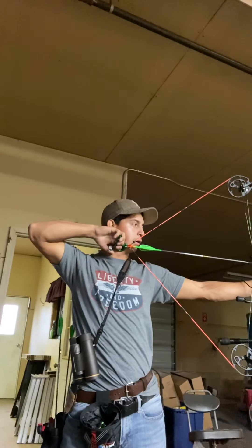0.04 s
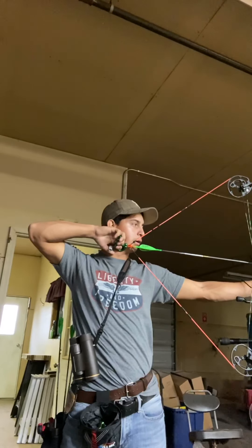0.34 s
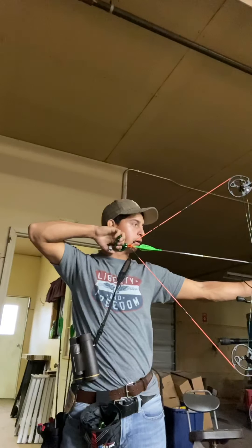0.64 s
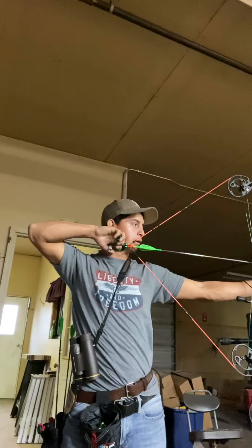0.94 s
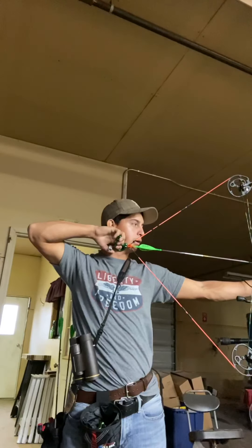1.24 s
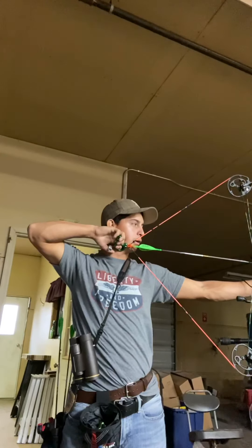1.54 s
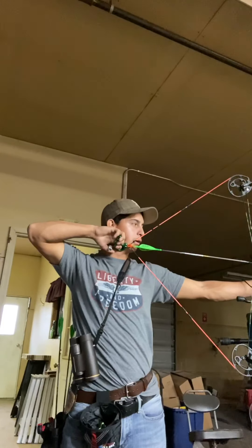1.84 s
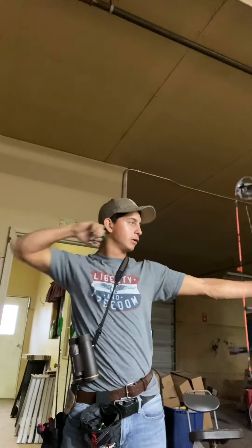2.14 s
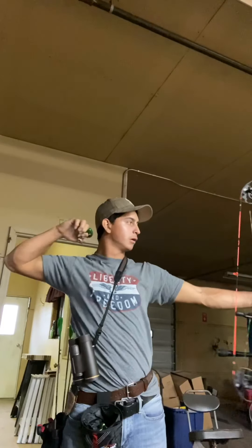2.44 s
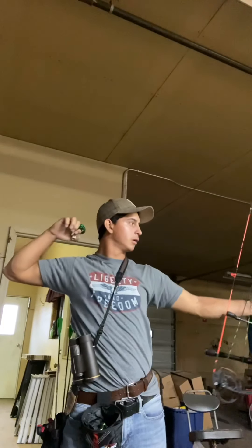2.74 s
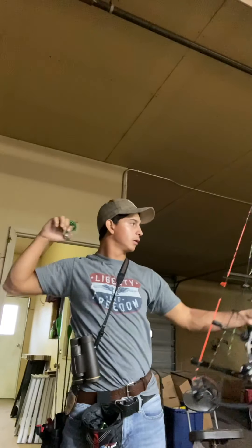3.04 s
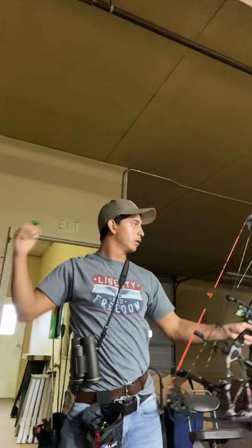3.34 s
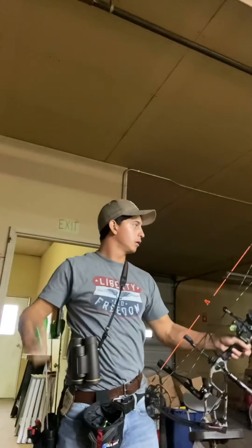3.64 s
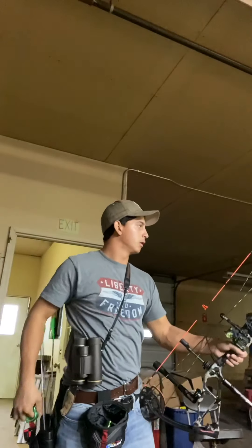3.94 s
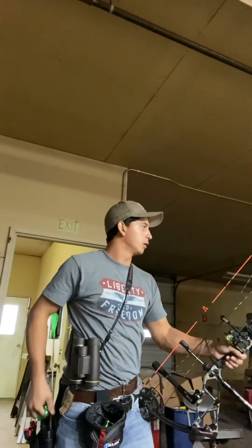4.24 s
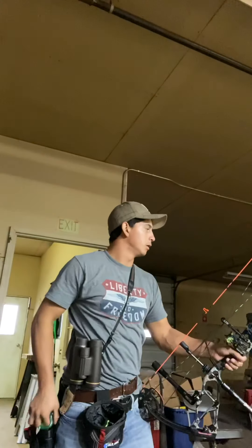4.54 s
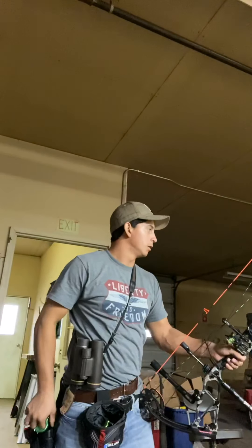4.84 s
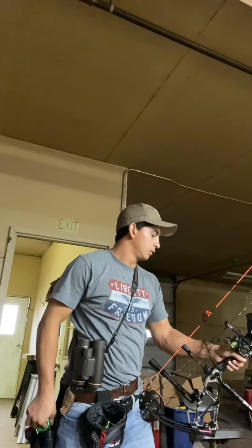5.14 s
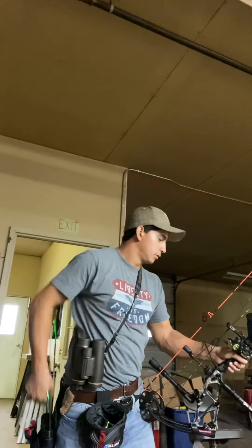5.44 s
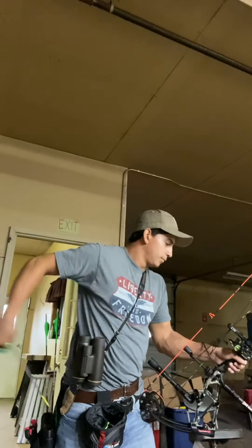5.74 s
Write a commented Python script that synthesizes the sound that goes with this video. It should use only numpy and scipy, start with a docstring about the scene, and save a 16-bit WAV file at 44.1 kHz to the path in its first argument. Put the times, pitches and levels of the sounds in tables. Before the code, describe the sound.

Ventilation rumbles and mains power hums softly in a large workshop. About two seconds in, a compound bow is shot close to the microphone: a click, a sharp string slap and a brief ringing thump. A moment later the arrow thuds into a far target and echoes through the hall. Then the archer's gear ticks, knocks and clinks, with some cloth rustling, while a low drone swells.

```python
"""First comes the rumble of ventilation and the hum of mains power in a large workshop.
About 2 s in, a compound bow is shot close by: the release (the clasp holding the string) clicks open,
the string slaps home, and the limbs (the bow's springy arms) thump and ring. 0.3 s later the arrow
thuds into a far target and fills the hall with echoes. Then the archer's gear ticks, knocks and
rustles while a low drone swells."""
import sys
import numpy as np
from scipy import signal
from scipy.fft import rfft, irfft
from scipy.io import wavfile

SR = 44100
rng = np.random.default_rng(int(sys.argv[2]) if len(sys.argv) > 2 else 0)


def output_pcm(signal):
    """Save a mono or channel-first signal as 16-bit PCM at the path in sys.argv[1].

    Samples are clipped to [-1, 1] before scaling.
    """
    pcm = np.clip(np.atleast_2d(signal).T, -1, 1) * 32767
    wavfile.write(sys.argv[1], SR, np.round(pcm).astype(np.int16))


N = 260190


def undb(db):
    """Turn decibels (dB) into a gain. Levels in this file are relative: later steps scale them."""
    return 10 ** (np.asarray(db) / 20)


def at_hz(points, hz):
    """Read a curve between its points, giving every octave equal room."""
    f, value = np.transpose(points)
    return np.interp(np.log(np.maximum(hz, 1)), np.log(f), value)


def colour(x, points, size=4096):
    """Make some frequencies louder and others softer."""
    cepstrum = irfft(np.log(undb(at_hz(points, np.fft.rfftfreq(size, 1 / SR)))))
    # fold the filter forward in time, so nothing sounds before the hit
    cepstrum[1:size // 2] *= 2
    cepstrum[size // 2 + 1:] = 0
    return signal.fftconvolve(x, irfft(np.exp(rfft(cepstrum))))[:N]


def wash(points):
    """Noise from all around, as mid (what left and right share) and side (how they differ)."""
    gain = undb(at_hz(points, np.fft.rfftfreq(N, 1 / SR)))
    noise = irfft(rfft(rng.standard_normal((2, N))) * gain, N)
    return noise / noise.std()


def wander(turns_per_s):
    """A random drift around zero, about 1 in size."""
    knots = rng.standard_normal(400)
    return np.interp(np.arange(N) / SR * turns_per_s, np.arange(len(knots)), knots)


def unit(x):
    """Scale to an energy of 1."""
    return x / np.sqrt(np.sum(x ** 2, axis=-1, keepdims=True))


def contacts(rows, points, size=4096, even_passes=3):
    """Each hit is a short chatter of force, coloured by the thing it strikes."""
    force, t = np.zeros(N + size), np.arange(size) / SR
    for (s, db, t60, *_), grit in zip(rows, rng.standard_normal((len(rows), size))):
        fade = undb(-60 * t / max(t60, .002))  # t60 is the fade time: seconds to drop 60 dB
        for _ in range(even_passes):  # a hard hit drives all frequencies alike
            spectrum = rfft(grit * fade)
            even = irfft(spectrum / np.abs(spectrum))
            grit = np.clip(even / (fade * unit(fade)[0] + 1e-12), -3, 3)
        start = min(int(s * SR), N)
        force[start:start + size] += undb(db) * unit(grit * fade)
    return colour(force[:N], points)


def resonate(force, modes):
    """A force shakes a small part at its modes, the pitches it naturally rings at."""
    hz = np.maximum(np.fft.rfftfreq(N, 1 / SR), 1)
    response = sum(undb(db) / (1 + 1j * (hz ** 2 - f ** 2) / (hz * width)) for f, width, db in modes)
    return irfft(rfft(force) * response, N)


def ring(start_s, modes, rise_s, size=32768):
    """A struck part rings with pure tones that die away."""
    t, start = np.arange(size) / SR, int(start_s * SR)
    tones = sum(undb(db - 60 * t / t60) * np.sin(2 * np.pi * hz * t) for hz, db, t60 in modes)
    return np.pad(tones * (1 - np.exp(-t / rise_s)), (start, N))[:N]


def jolts(start_s, db, t60, gap_s, growth, loss_db, count):
    """List a run of ever weaker hits; each gap is `growth` times the one before."""
    k = np.arange(count)
    gaps = gap_s * growth ** k
    starts = start_s + np.cumsum(gaps) - gaps
    return [(s, level, t60) for s, level in zip(starts, db - loss_db * k)]


def bounced(rows):
    """A small loose part bounces once, more softly, after each hit."""
    return [hit for row in rows for hit in jolts(*row, gap_s=.017, growth=1, loss_db=11, count=2)]


def reflections(t60_points, build_s, size=65536):
    """Dense echoes without the highest treble build up, then die at each octave's own rate."""
    t, hz = np.arange(size) / SR, np.fft.rfftfreq(size, 1 / SR)
    treble_cut = 1 / (1 + (hz / 13000) ** 30)
    noise, echoes = treble_cut * rfft(rng.standard_normal((2, size))), 0
    octave = np.log2(np.clip(hz, 62.5, 16000) / 62.5)
    for k in range(9):
        band = irfft(noise * np.maximum(1 - np.abs(octave - k), 0))
        echoes = echoes + band * undb(-60 * t / at_hz(t60_points, 62.5 * 2 ** k))
    return unit(echoes * (1 - np.exp(-t / build_s)))


# How long the hall echoes. Each row: frequency in Hz, fade time in seconds.
HALL_FADE = [(60, 1.6), (250, 0.89), (600, 1.207), (2000, 1.073), (4000, 1.02), (8000, 0.61), (16000, 0.44)]

def in_hall(x, direct_db, early_db, late_db, early_t60, build_s):
    """Sound arrives directly, then off nearby surfaces, then as the hall's long tail."""
    early = reflections([(60, early_t60), (16000, early_t60)], build_s=.0047)
    echoes = undb(early_db) * early + undb(late_db) * reflections(HALL_FADE, build_s)
    hz = np.fft.rfftfreq(N, 1 / SR)
    # the right microphone hears it first; below about 600 Hz both hear nearly the same
    side = irfft(-1j * hz / np.hypot(hz, 600.5) * rfft(x), N)
    return undb(direct_db) * np.array([x, side]) + signal.fftconvolve(x[None], echoes, axes=1)[:, :N]


# The rumble of moving air. Each row: frequency in Hz, level in dB.
AIR_COLOUR = [(18, -37), (30, -24.5), (42, -6), (65, -2), (105, -6), (180, -13.5), (300, -14), (430, -21.5),
              (620, -27.5), (950, -33.7), (1450, -32.7), (2200, -35), (4500, -50.5), (8000, -59),
              (16000, -68.5)]
# Steady machine tones. Each row: pitch in Hz, level in dB.
HUM_TONES = [(80.7, -60), (279.9, -79.5), (360.2, -55.5), (419.9, -73), (479.5, -74.5), (599, -74),
             (720.5, -76.5)]
MID_ONLY = np.array([[1], [0]])

def machines(drone_hz=79, drone_full_s=5.59, rise_db_per_s=11):
    """Ventilation rumbles, mains power hums, and a low drone swells and stays."""
    t = np.arange(N) / SR
    air = undb(-52.2) * wash(AIR_COLOUR)
    hum = sum(undb(db - wander(11)) * np.sin(2 * np.pi * hz * t + .12 * wander(2.8))
              for hz, db in HUM_TONES)
    swell_db = -46.5 - rise_db_per_s * np.maximum(drone_full_s - t, 0)
    phase = 2 * np.pi * drone_hz * t + 1.1 * wander(11)
    drone = undb(swell_db + 2.5 * wander(9)) * (np.sin(phase) + undb(-12) * np.sin(2 * phase))
    return air + np.sqrt(2) * (hum + drone) * MID_ONLY


def wavering_hum(hz=287.5, drift_hz=14, fade_from_s=1.8, fade_db_per_s=20):
    """A faint low tone drifts in pitch and level, then fades."""
    t = np.arange(N) / SR
    phase = 2 * np.pi * np.cumsum(hz + drift_hz * wander(2.2)) / SR + .8 * wander(25)
    db = -63.5 + 3 * wander(6.1) - fade_db_per_s * np.maximum(t - fade_from_s, 0)
    return np.sqrt(2) * undb(db) * np.sin(phase) * MID_ONLY


# Arm movements. Each row: start in seconds, length in seconds, rub level in dB, swish level in dB.
ARM_STROKES = [(3.938, .12, -56, -65.5), (4.045, 0.23, -70, -63), (4.68, 0.11, -74, -66),
               (5.034, 0.14, -57, -57.5), (5.234, 0.24, -55, -61.5), (5.645, 0.12, -42, -76)]
# The cloth's low rub and high swish. Each row: frequency in Hz, level in dB.
RUB_SOUND = [(100, -18), (220, 14), (450, 10.5), (900, 5), (2400, 2), (4000, -5), (8000, -27.5),
             (16000, -50)]
SWISH_SOUND = [(500, -6), (2500, 14), (4500, 22.5), (7500, 15), (10000, 10.5), (16000, -15)]

def cloth(rise_s=.056, fall_s=.086, level_db=-5):
    """Shirt and pouch rub unevenly; each stroke builds up, holds and dies away."""
    t, rub, swish = np.arange(N) / SR, 0, 0
    for s, length_s, rub_db, swish_db in ARM_STROKES:
        stroke = np.clip((t - s) / rise_s, 0, 1) * np.exp(-np.maximum(t - s - length_s, 0) / fall_s)
        rub = np.hypot(rub, undb(rub_db) * stroke)
        swish = np.hypot(swish, undb(swish_db) * stroke)
    return (rub * wash(RUB_SOUND) + swish * wash(SWISH_SOUND)) * undb(level_db + 2 * wander(65))


# Gear knocking. Each row: start in seconds, edge level in dB, wait for the bump in seconds,
# bump level in dB, bump pitch in Hz.
GEAR_KNOCKS = [(4.054, -47.5, 0.013, -48, 540), (4.144, -45, 0.029, -37, 625), (4.264, -37, .018, -49, 594),
               (4.337, -34, .012, -49, 590), (4.408, -36.5, 0.021, -33.5, 574),
               (4.666, -34, .013, -30.5, 477), (4.843, -42.5, .012, -45.5, 610),
               (4.992, -43.5, 0.015, -49, 780), (5.076, -41.5, 0.013, -31, 490),
               (5.145, -47, 0.00297, -41, 436), (5.457, -42.5, 0.0027, -37.5, 427),
               (5.597, -39.5, 0.019, -41, 452)]
# The dull sound of a knock. Each row: frequency in Hz, level in dB.
KNOCK_SOUND = [(50, -7), (140, -6.5), (230, 1.5), (330, -5), (450, 4), (600, -2), (780, -2), (1000, -7.5),
               (1400, -8.5), (2400, -7), (4000, -20), (8000, -32), (16000, -56)]

def gear(edge_hz=1330, hollow_db=-31, hollow_t60=.019):
    """Heavier gear lands edge first, bumps down and rocks to rest; each hit rings hollow."""
    hits = []
    for s, edge_db, lag_s, bump_db, hz in GEAR_KNOCKS:
        bumps = jolts(s + lag_s, bump_db, t60=.015, gap_s=.024, growth=1.6, loss_db=5.5, count=3)
        hits += [(s, edge_db, .014, edge_hz)] + [(*bump, hz) for bump in bumps]
    hollow = sum(ring(s, [(hz, db + hollow_db, hollow_t60)], rise_s=.0013, size=4096)
                 for s, db, _, hz in hits)
    knocks = contacts(hits, KNOCK_SOUND, even_passes=0) + hollow
    return in_hall(knocks, direct_db=26.5, early_db=27, late_db=22, early_t60=.094, build_s=.0033)


# Ticks and clinks. Each row: start in seconds, level in dB, fade time in seconds.
FITTING_TICKS = [(3.9762, -52.5, .007), (4.151, -35, 0.043), (4.2696, -28.5, 0.013), (4.338, -48, .01),
                 (4.4114, -32, 0.013), (4.7052, -38, 0.013)]
CLASP_CLINKS = [(5.0984, -32.5, 0.017), (5.1786, -45.5, .02), (5.2567, -43, 0.0027), (5.3052, -42, 0.015),
                (5.335, -38.5, 0.23), (5.4596, -44, 0.039), (5.8841, -28.5, 0.018)]
# The tap that starts both. Each row: frequency in Hz, level in dB.
TAP_SOUND = [(100, -35), (700, 5.5), (1500, -10), (2500, -7), (3200, -1.5), (4200, -6), (5300, -5),
             (7500, -6), (10000, -10), (16000, -11.5)]
# How the fittings and the release ring. Each row: pitch in Hz, width in Hz (wider dies sooner),
# level in dB.
FITTING_RING = [(1304, 110, -1), (2000, 190, 3), (2410, 360, 2.5), (3100, 210, 0), (3810, 510, -2.5),
                (4305, 130, 3.5), (4970, 210, -1.5), (5600, 150, -1.5), (6290, 360, 1), (7230, 300, -1),
                (7780, 230, -1.5), (8700, 220, -4), (9500, 120, -16), (10800, 190, -17)]
CLASP_RING = [(1240, 200, 0.5), (1530, 43, -28), (2390, 190, 7), (3180, 220, 0.5), (3420, 200, -7),
              (3890, 380, 2), (4290, 150, 0), (4980, 120, 1.5), (5150, 170, -4.5), (6130, 210, -1.5),
              (7040, 830, -8.5), (7900, 230, -9), (8890, 620, -13)]

def small_parts():
    """Fittings tick as the bow is lowered; the release clinks against belt and pouch."""
    # loose parts chatter unevenly, so every tick favours other pitches
    fittings = resonate(contacts(bounced(FITTING_TICKS), TAP_SOUND, even_passes=0), FITTING_RING)
    clasp = resonate(contacts(bounced(CLASP_CLINKS), TAP_SOUND, even_passes=0), CLASP_RING)
    parts = fittings + clasp
    return in_hall(parts, direct_db=26.5, early_db=26, late_db=20.5, early_t60=.18, build_s=.012)


# The point piercing the target. Each row: start in seconds, level in dB, fade time in seconds.
PIERCE_HIT = [(2.3542, 14, .025)]
# The sharp piercing and the deep thud. Each row: frequency in Hz, level in dB.
PIERCE_SOUND = [(200, -7), (700, 1.5), (1400, 6), (2200, -4.5), (4000, -17), (9000, -24.5), (16000, -32.5)]
THUD_SOUND = [(35, -19), (80, -13.5), (120, -11), (170, -11.5), (230, -3.5), (330, 2.5), (450, -1),
              (700, -8), (1100, -14), (1500, -14.5), (2400, -16), (4000, -25), (6000, -35), (10000, -43.5),
              (16000, -59)]

def target():
    """The arrow hits far away; floor and walls return the thud over ever longer paths."""
    arrivals = jolts(start_s=2.356, db=26, t60=.028, gap_s=.006, growth=1.38, loss_db=.82, count=7)
    thud = contacts(arrivals, THUD_SOUND) + contacts(PIERCE_HIT, PIERCE_SOUND)
    return in_hall(thud, direct_db=-6.5, early_db=-7, late_db=-4.5, early_t60=.13, build_s=.013)


# The jaw opening and the arrow sliding off. Each row: start in seconds, level in dB,
# fade time in seconds.
RELEASE_CLICKS = [(2.0415, -1.5, 0.02), (2.0432, 3.5, 0.01), (2.0444, 11, 0.0048), (2.049, 1.5, .06)]
# Their bright sound. Each row: frequency in Hz, level in dB.
CLICK_SOUND = [(100, -13.5), (600, -13), (1500, -13), (2700, -4), (3100, 4.5), (3550, -6.5), (5500, -6.5),
               (7200, 0), (8200, -2.5), (9600, -1), (12000, -6.5), (16000, -5.5)]
# The jaw's ping. Each row: pitch in Hz, level in dB, fade time in seconds.
JAW_TONES = [(3082, -10.5, 0.015), (6710, -20.5, 0.009)]

def release():
    """The release's jaw clicks open and pings as it lets the string go."""
    click = contacts(RELEASE_CLICKS, CLICK_SOUND)
    click = in_hall(click, direct_db=-2, early_db=-6, late_db=-7, early_t60=.2, build_s=.026)
    ping = ring(start_s=2.0435, modes=JAW_TONES, rise_s=.00055)
    return click + in_hall(ping, direct_db=-1, early_db=-11.5, late_db=-18, early_t60=.15, build_s=.02)


# The string and cams (the bow's pulleys) slapping their stops. Each row: start in seconds,
# level in dB, fade time in seconds.
STRING_SLAPS = [(2.0602, 20, 0.015), (2.0622, 14.5, 0.026), (2.0645, 24, 0.032), (2.077, 22, 0.044)]
# The sharp slap and the low thump of the recoil. Each row: frequency in Hz, level in dB.
SLAP_SOUND = [(100, -18.5), (600, -14), (1300, -12), (2200, -1), (3000, -3.5), (3600, -6.5), (4500, -2.5),
              (5600, -11.5), (7500, -18.5), (11000, -22.5), (12200, -21.5), (13200, -52)]
RECOIL_SOUND = [(40, -21.5), (140, -10.5), (240, -2.5), (350, 1.5), (450, -10.5), (680, 3.5), (950, -7),
                (1500, -7), (2500, -19), (6000, -32), (16000, -56)]
# The bow's ringing. Each row: pitch in Hz, level in dB, fade time in seconds.
BOW_TONES = [(242.3, -6, 0.32), (339, -1, .36), (490, -8, 0.079), (641, -9, .28), (749, -9.5, 0.12),
             (1107, -12.5, 0.31), (1864, -16, .2), (2194, -10.5, 0.27), (2100, -18, .2), (2430, -18, 0.6),
             (2520, -14.5, 0.36), (3110, -8.5, 0.14), (4070, -17.5, .3), (4265, -24.5, .3),
             (4200, -23.5, .3), (5070, -25, 0.32)]

def bow():
    """The string slaps home, limbs and handle recoil in a run of jolts, and the bow rings on."""
    recoil = jolts(start_s=2.0655, db=27, t60=.036, gap_s=.0046, growth=1.5, loss_db=2.5, count=6)
    shot = contacts(STRING_SLAPS, SLAP_SOUND) + contacts(recoil, RECOIL_SOUND)
    shot = in_hall(shot, direct_db=-3, early_db=-10.5, late_db=-14.5, early_t60=.25, build_s=.017)
    limbs = undb(-21.5) * ring(start_s=2.068, modes=BOW_TONES, rise_s=.0032)
    return shot + in_hall(limbs, direct_db=4, early_db=-8.5, late_db=-18.5, early_t60=.21, build_s=.02)


# How alike the two microphones sound. Each row: frequency in Hz, likeness from -1 (opposite) to 1 (same).
MIC_LIKENESS = [(50, .999), (130, .99), (300, .89), (550, .58), (950, .38), (1400, .55), (2300, .42),
                (3400, -.05), (4200, .25), (5200, -.2), (7100, .72), (10000, 0), (11600, -.6),
                (12600, -.995)]
# Which one is louder. Each row: frequency in Hz, left level minus right level in dB.
MIC_BALANCE = [(100, 0), (250, 1), (1000, -0.5), (2000, -0.3), (4000, 1.6), (8000, .5)]

def scene():
    """All sources reach a phone's two close microphones; mid and side become left and right."""
    archery = release() + bow() + target() + small_parts() + gear() + cloth()
    mid, side = rfft(archery + machines() + wavering_hum())
    hz = np.fft.rfftfreq(N, 1 / SR)
    alike = np.clip(at_hz(MIC_LIKENESS, hz), -.999, .999)
    mid, side = mid * np.sqrt((1 + alike) / 2), side * np.sqrt((1 - alike) / 2)
    lean = undb(at_hz(MIC_BALANCE, hz) / 2)
    return irfft(np.array([(mid + side) * lean, (mid - side) / lean]), N)


def record(dry):
    """The phone cuts the treble above 16000 Hz."""
    return signal.sosfilt(signal.ellip(8, .2, 70, 16000, fs=SR, output="sos"), dry)


dry = scene()
out = record(dry)
output_pcm(out)
```